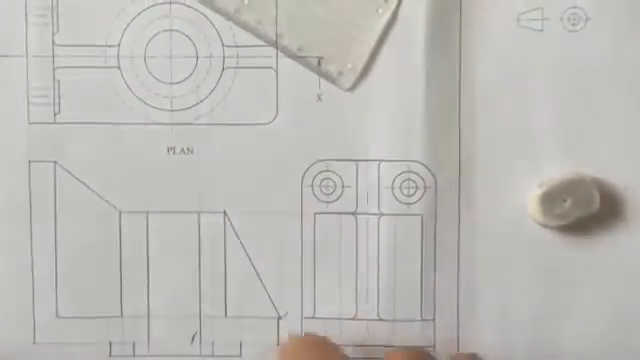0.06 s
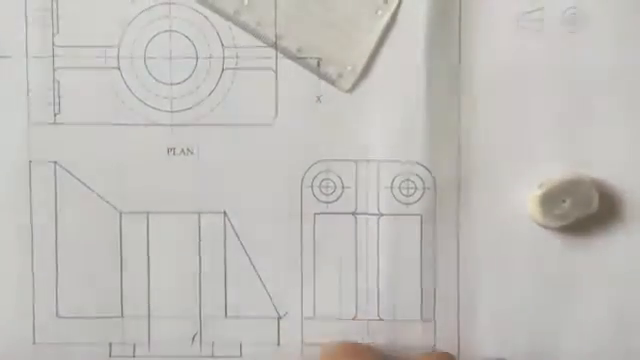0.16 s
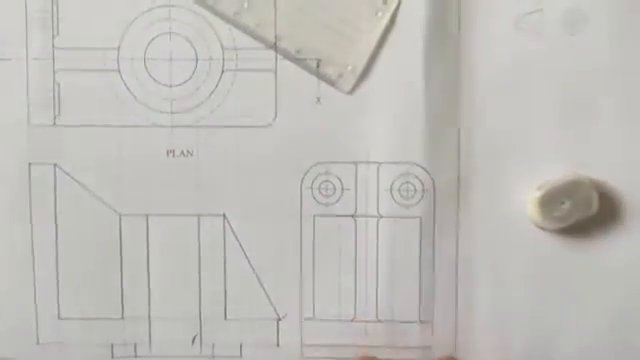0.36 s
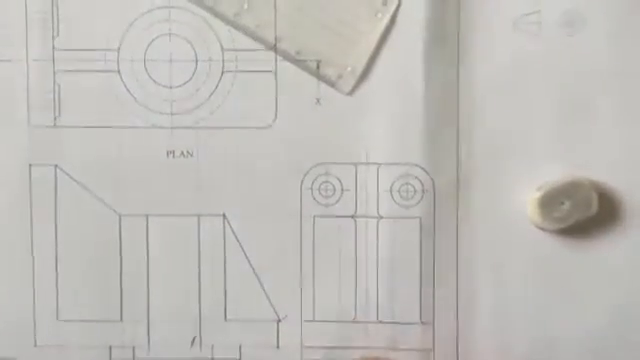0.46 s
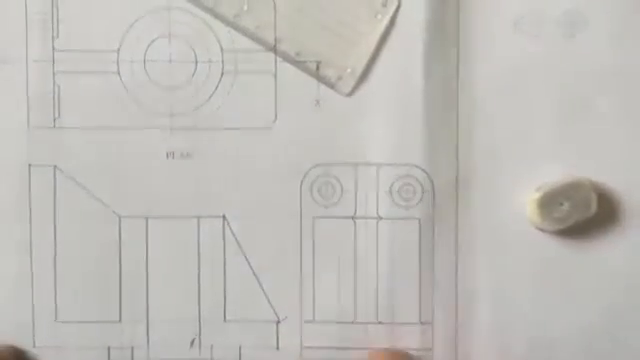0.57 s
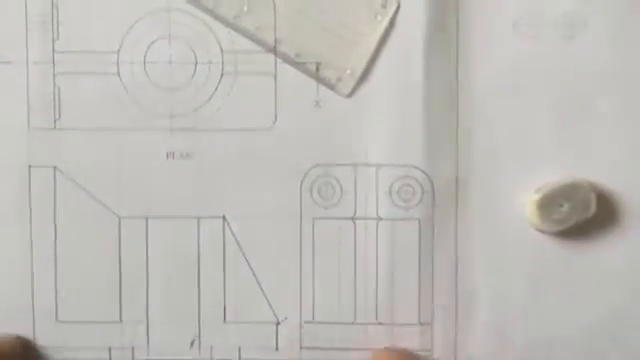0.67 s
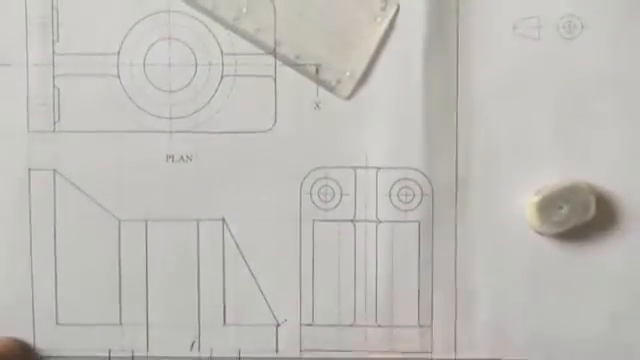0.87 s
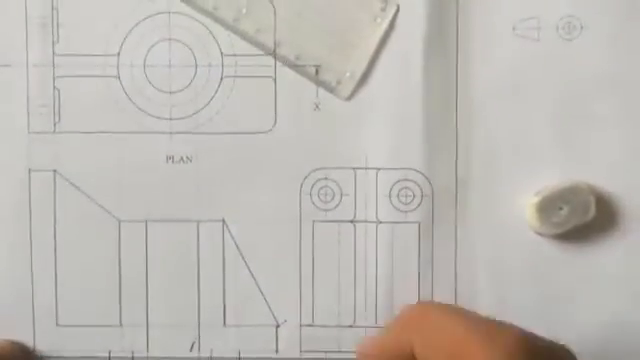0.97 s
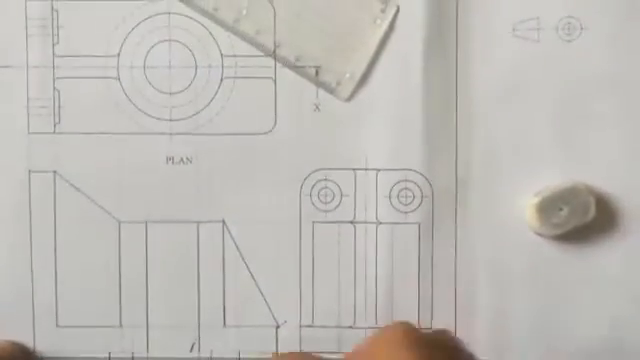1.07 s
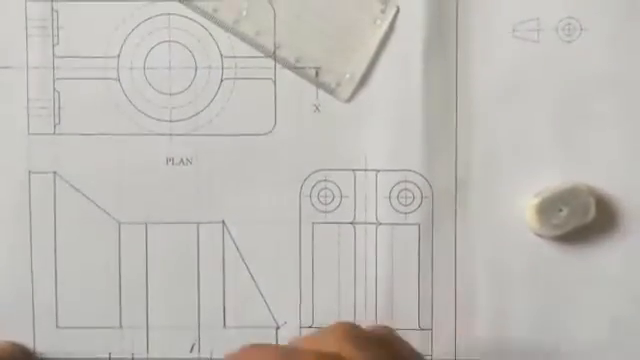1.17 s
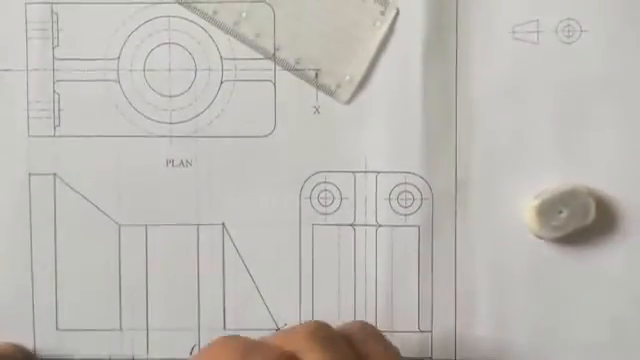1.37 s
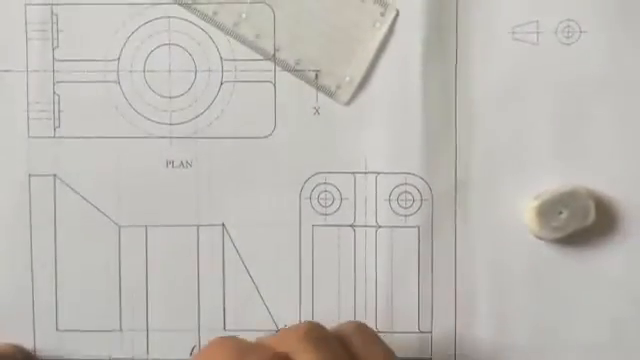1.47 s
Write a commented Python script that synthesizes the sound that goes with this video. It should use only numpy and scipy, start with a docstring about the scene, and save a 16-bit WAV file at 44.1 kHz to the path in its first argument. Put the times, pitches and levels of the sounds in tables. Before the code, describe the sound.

Close up in a small room, a hard plastic ruler is put down and shifted on paper over a desk, giving three uneven groups of clicks and dull knocks with faint scratches, then a softer tap and quiet.

```python
"""Plastic ruler set down on a desk

A plastic ruler is shifted and set down on paper on a desk, close to a camera on the same desk.
Edge taps: brief bank of decaying ruler modes plus a bright noise crack.
Landings: desk-top modes, treble first, bass late. Slides: filtered random grit on the paper.
A small room answers with a diffuse noise tail, over a quiet floor of coloured noise."""
import sys
import numpy as np
from scipy import signal
from scipy.fft import rfft, irfft
from scipy.io import wavfile
from scipy.ndimage import uniform_filter1d

SR = 44100
rng = np.random.default_rng(int(sys.argv[2]) if len(sys.argv) > 2 else 0)


def generate_wav(signal):
    """Clip the signal to [-1, 1] and save it as 16-bit WAV at the path in sys.argv[1]."""
    frames = np.transpose(np.atleast_2d(signal))
    scaled = np.clip(frames, -1, 1) * 32767
    pcm = np.round(scaled).astype(np.int16)
    wavfile.write(sys.argv[1], SR, pcm)


def level_to_linear(level):
    """Convert decibel levels to linear amplitude factors, elementwise."""
    exponent = np.asarray(level, float) / 20
    return 10 ** exponent


N = 66150

# background noise density, relative: hz, level_db_per_hz
FLOOR_SPECTRUM = [(15, -57), (25, 5.5), (242, 4.5), (277, -3), (624, -4), (796, -3), (1040, -4),
                  (2990, -13), (14400, -19), (16000, -32)]
FLOOR_RMS_DB = -62.5

# slides over the paper: start_s, length_s, level_db (rms before the fades), centre_hz
PAPER_SLIDES = [(-.01, 0.035, -56, 2945), (-.01, 0.072, -64, 10060), (0.036, 0.08, -60.5, 3840),
                (0.236, .012, -29, 4700), (0.273, 0.056, -38, 2820), (0.479, .036, -28.5, 3500),
                (0.542, 0.0098, -41, 4300), (.642, 0.034, -32.5, 2060), (0.751, 0.016, -38, 5900),
                (0.779, 0.051, -38, 4200), (1.033, 0.029, -61, 9200), (1.26, 0.05, -69.5, 8090),
                (0.118, 0.037, -62.5, 9400), (0.415, 0.093, -54, 1560), (0.56, 0.071, -51, 1470),
                (0.68, 0.044, -41.5, 3030), (.502, 0.0043, -44, 7900)]
SLIDE_FADE_S = 0.016  # linear rise; time constant of the decay
GRIT_PER_S, GRIT_SPREAD_DB = 9000, 2.5
CATCH_S, CATCH_DB = 0.003, 1.5  # edge catches and slips: time scale, spread of the grit level

# landings on the desk top: start_s, level_db (before DESK_GAIN_DB), ring_centre_hz
DESK_LANDINGS = [(.003, -30, 161), (.057, -24.5, 404), (.059, -27.5, 180), (0.07, -26, 104),
                 (.085, -33.5, 236), (.237, -7.5, 549), (0.2394, -10.5, 170.4), (0.25, -8.5, 377),
                 (0.256, -23, 71), (0.276, -9, 245), (0.287, -11.5, 257), (0.302, -8.5, 442),
                 (0.314, -8, 330), (.323, -10.5, 310), (.320, -12.5, 75), (0.338, -19.5, 118),
                 (0.357, -17, 148.6), (.410, -29.5, 75), (0.454, -35, 65), (0.032, -42, 69.7),
                 (0.124, -41, 70), (.155, -40, 381), (0.197, -39, 137), (.471, -14.5, 480),
                 (.477, -15.5, 346), (0.477, -22, 69.6), (.489, -14.5, 243), (0.514, -13.5, 74),
                 (.545, -19, 73), (.600, -50, 69), (.636, -10, 587), (.654, -11, 511), (.667, -7, 310),
                 (0.683, -13, 255), (0.687, -16, 69.6), (0.691, -21, 304), (.732, -18, 277),
                 (0.733, -21.5, 76), (0.743, -25.5, 194), (.774, -17.5, 214), (.799, -19, 530),
                 (.812, -25.5, 247), (0.917, -41, 71), (.966, -17, 346), (0.973, -17.5, 238),
                 (0.987, -23, 68.8), (0.999, -24, 355), (1.009, -31, 198), (1.099, -54.5, 257),
                 (1.399, -52, 165), (1.471, -48.5, 92)]
# desk-top modes: nominal_hz, relative_level_db, t60_s
DESK_MODES = [(69.2, 4, 0.15), (103.9, 0, 0.089), (157.1, -4, .25), (207.3, -8.5, 0.23), (254.3, 6, 0.05),
              (316, 3.5, 0.072), (357.3, -5.5, 0.18), (429, -3, 0.12), (507, 2.5, 0.071), (573, 5.5, 0.054),
              (714.2, -9.5, .1), (855.3, 6, 0.076), (1093, 0, 0.106), (1260, 8.5, 0.058)]
DESK_GAIN_DB, DESK_REACH_OCT, DESK_LAG_S, DESK_LAG_REF_HZ = -3, 0.99, 0.00084, 166.7

# ruler edge taps, levels before the gains below:
# start_s, ring_level_db, crack_level_db, ring_centre_hz, direct_reach_oct
EDGE_TAPS = [(.058, -28.5, -59, 1080, 0.75), (0.0834, -40, -43.5, 1730, 0.31),
             (0.0951, -32.5, -43.5, 2000, 0.16), (.167, -37.5, -56, 1400, 0.6),
             (0.2048, -35, -47, 2120, 0.25), (0.229, -37.5, -74, 3000, 1), (0.2393, -3, -26, 3400, 0.71),
             (0.245, -20, -35, 3200, 0.65), (0.2508, -17, -35.5, 1200, 0.42), (0.2742, -9, -27, 3300, 0.65),
             (0.2996, -20, -38, 3300, 1), (0.3068, -13.5, -32.5, 3200, 1), (.3255, -23.5, -36, 2940, 1),
             (0.3511, -23, -35.5, 2670, 1), (0.4362, -25, -50.5, 2910, 0.17),
             (.4375, -29.5, -69, 1500, 0.27), (.4602, -46, -37.5, 5620, .2),
             (0.4741, -18.5, -38, 1730, 0.89), (0.4874, -27, -32, 3500, 0.43),
             (0.4977, -16.5, -28.5, 1460, 0.23), (0.5042, -20.5, -27.5, 1480, 0.29),
             (.5105, -20.5, -37, 3000, .6), (.5178, -7, -48, 1394, .3), (.5255, -35, -42, 2970, 0.54),
             (.5470, -22, -33, 2570, 1), (0.6343, -19.5, -20.5, 1190, 0.9), (.641, -10.5, -57, 1100, 0.91),
             (0.65, -13, -31.5, 1260, 1), (0.661, -19, -34, 1300, 0.82), (0.7198, -14.5, -54, 1750, .25),
             (0.725, -21, -66, 1800, 0.39), (.7620, -16.5, -25.5, 2010, 0.7), (0.768, -15.5, -44, 1260, .4),
             (0.7877, -16, -21.5, 3320, 0.34), (0.792, -7, -50, 1150, 1), (0.7975, -45, -49, 1562, 0.97),
             (0.826, -30.5, -31, 1970, 0.43), (0.9636, -14.5, -32.5, 3780, 0.77),
             (0.9676, -29.5, -50, 2500, 1), (0.9962, -26, -42, 3320, 0.58), (1.12, -41.5, -75, 1243, 1),
             (1.1820, -45, -43, 3500, 1), (1.405, -53.5, -70.5, 1202, 0.68)]
# ruler modes: nominal_hz, relative_level_db, direct_t60_s
RULER_MODES = [(1075, 0, .05), (1260, 0, .05), (1480, 0, .035), (1620, 0, .045), (1800, 0, .04),
               (2116, -2, .035), (2450, -3, .03), (2800, -3, .025), (3080, 0, .03), (3300, 1, .03),
               (3550, 0, .028), (3900, -2, .022), (4500, -4, .018), (5500, -6, .015)]
RULER_GAIN_DB, RULER_LAG_S, RULER_LAG_REF_HZ = -4.5, 0.0005, 1400
# crack filter: hz, gain_db
CRACK_SPECTRUM = [(700, -11), (1500, 1), (3000, 1.5), (5000, -0.5), (7000, 0.5), (9000, -5.5), (11000, -11),
                  (13000, -24.5), (15500, -21.5)]
CRACK_GAIN_DB, CRACK_RISE_S = 6.5, 0.0004
CRACK_DECAY_S, CRACK_REF_DB = 0.0029, -26.5  # decay constant of a crack at the reference level
CRACK_SHRINK = 0.38  # dB of length lost per dB below CRACK_REF_DB

# room decay: hz, t60_s
ROOM_DECAY = [(60, .5), (300, 0.6), (1500, 0.47), (5000, 0.58), (12000, 0.65)]
# filter on the sound sent to the room: hz, gain_db
ROOM_SPECTRUM = [(40, -0.5), (300, -4.5), (1500, 3.5), (4000, -2.5), (8000, -4.5), (16000, -13.5)]
ROOM_GAIN_DB, ROOM_RISE_S = -10, 0.006
RING_ROOM_DB, CRACK_ROOM_DB, PAPER_ROOM_DB = 8, 1, 2  # send to the walls, against the desk

CEILING = 0.57  # full scale = 1
BASS_CUT_HZ, TOP_CUT_HZ = 64, 14850


def colour(x, points):
    """Filters by (Hz, dB) points, linear in log frequency."""
    hz, db = np.array(points, float).T
    bin_hz = np.maximum(np.fft.rfftfreq(len(x), 1 / SR), 1)
    gain_db = np.interp(np.log(bin_hz), np.log(hz), db, left=db[0] + 7, right=db[-1] - 6)
    return irfft(rfft(x) * level_to_linear(gain_db), len(x))


def unit(x):
    """Scales to rms 1."""
    return x / np.sqrt(np.mean(x ** 2))


def add(out, start_s, x):
    """Mixes x in at start_s."""
    i = int(start_s * SR)
    out[i:i + len(x)] += x[:len(out) - i]


def floor():
    """Steady background: Gaussian noise shaped by the floor spectrum."""
    return level_to_linear(FLOOR_RMS_DB) * unit(colour(rng.standard_normal(N), FLOOR_SPECTRUM))


def paper():
    """Dense uneven grit under the sliding edge, broad around each slide's centre."""
    out, t = np.zeros(N), np.arange(N) / SR
    hit, size, sign = rng.random((3, N))
    grain_gain = level_to_linear(-GRIT_SPREAD_DB * np.log(size + 1e-9))
    grit = unit((hit < GRIT_PER_S / SR) * grain_gain * np.sign(sign - 0.5))
    catch = unit(uniform_filter1d(rng.standard_normal(N), int(CATCH_S * SR)))
    grit = grit * level_to_linear(CATCH_DB * catch)
    for start_s, length_s, level_db, hz in PAPER_SLIDES:
        rise = np.clip((t - start_s) / SLIDE_FADE_S, 0, 1)
        fall = np.exp(-np.maximum(t - start_s - length_s, 0) / SLIDE_FADE_S)
        spectrum = [(hz / 8, -6), (hz / 3, 3), (hz, 0), (hz * 1.21, -6), (hz * 3, -20)]
        out += level_to_linear(level_db) * unit(colour(grit, spectrum)) * rise * fall
    return out


def ring(starts_s, levels_db, centres_hz, reaches_oct, modes, lag_s, ref_hz, scatter_db, scatter_rad):
    """Each blow rings the modes near its centre; lower modes build up later."""
    out, t = np.zeros(N), np.arange(SR // 4) / SR
    hz, db, t60_s = np.array(modes, float).T[:, :, None]
    rise_s = lag_s * np.sqrt(ref_hz / hz)  # lag_s holds at ref_hz
    envelope = (1 - np.exp(-t / rise_s)) ** 2 * np.exp(-np.log(1000) * t / t60_s)
    mode_phase = -np.pi * np.arange(len(modes))[:, None] / 2
    chance = rng.standard_normal((len(starts_s), 3, len(modes), 1))
    blows = zip(starts_s, levels_db, centres_hz, reaches_oct, chance)
    for start_s, level_db, centre_hz, reach_oct, (gain, detune, phase) in blows:
        distance = np.log2(hz / centre_hz) / reach_oct
        weight = level_to_linear(db + scatter_db * gain) * np.exp(-0.5 * distance ** 2)
        wave = np.sin(2 * np.pi * hz * (1 + 0.042 * detune) * t + mode_phase + scatter_rad * phase)
        blow = (weight * envelope * wave).sum(0) / np.sqrt((weight ** 2).sum())
        add(out, start_s, level_to_linear(level_db) * blow)
    return out


def desk():
    """Landings send bending waves through the desk top: modes rise treble first, bass late."""
    start_s, level_db, hz = np.array(DESK_LANDINGS, float).T
    reach_oct = np.full(len(start_s), DESK_REACH_OCT)
    return ring(start_s, level_db + DESK_GAIN_DB, hz, reach_oct, DESK_MODES,
                DESK_LAG_S, DESK_LAG_REF_HZ, scatter_db=3.0, scatter_rad=1.0)


def ruler_cracks():
    """Contact of each edge tap: a bright noise burst, shorter when softer."""
    start_s, _, crack_db, _, _ = np.array(EDGE_TAPS, float).T
    t, out = np.arange(SR // 40) / SR, np.zeros(N)
    noises = rng.standard_normal((len(start_s), len(t)))
    for start, level_db, noise in zip(start_s, crack_db, noises):
        decay_s = CRACK_DECAY_S * level_to_linear(CRACK_SHRINK * (level_db - CRACK_REF_DB))
        envelope = (1 - np.exp(-t / CRACK_RISE_S)) * np.exp(-t / decay_s)
        add(out, start, level_to_linear(level_db + CRACK_GAIN_DB) * noise * envelope)
    return colour(out, CRACK_SPECTRUM)


def ruler_rings(reach_scale, t60_scale):
    """Edge taps excite the ruler's modes, which die within tens of milliseconds."""
    start_s, ring_db, _, hz, reach_oct = np.array(EDGE_TAPS, float).T
    modes = np.array(RULER_MODES) * [1, 1, t60_scale]
    return ring(start_s, ring_db + RULER_GAIN_DB, hz, reach_oct * reach_scale, modes,
                RULER_LAG_S, RULER_LAG_REF_HZ, scatter_db=2, scatter_rad=2.4)


def room(x):
    """Diffuse tail: octave bands of noise, each decaying at its own t60."""
    t, tail = np.arange(SR // 2) / SR, 0
    decay_hz, decay_t60_s = np.array(ROOM_DECAY, float).T
    for hz, noise in zip(45 * 2.0 ** np.arange(9), rng.standard_normal((9, len(t)))):
        edges_hz = [hz / np.sqrt(2), hz * np.sqrt(2)]
        band = signal.sosfilt(signal.butter(2, edges_hz, "band", fs=SR, output="sos"), noise)
        t60_s = np.interp(np.log(hz), np.log(decay_hz), decay_t60_s)
        tail = tail + band * np.exp(-np.log(1000) * t / t60_s)
    tail = tail * np.clip(t / ROOM_RISE_S, 0, 1)
    tail = tail / np.sqrt((tail ** 2).sum())
    return level_to_linear(ROOM_GAIN_DB) * signal.fftconvolve(colour(x, ROOM_SPECTRUM), tail)[:N]


def scene():
    """Ruler, desk and paper in the room, over its floor."""
    cracks = ruler_cracks()
    rings = ruler_rings(reach_scale=1, t60_scale=1)
    rings_far = ruler_rings(reach_scale=2.2, t60_scale=0.18)  # the walls get a broader, shorter ring
    thuds, grit = desk(), paper()
    far = level_to_linear(RING_ROOM_DB) * rings_far + level_to_linear(CRACK_ROOM_DB) * cracks
    far = far + level_to_linear(PAPER_ROOM_DB) * grit + thuds
    mix = rings + cracks + thuds + grit + room(far) + floor()
    return mix[None]


def roll_off(x):
    """The treble ends steeply here."""
    return signal.sosfilt(signal.butter(12, 16320, fs=SR, output="sos"), x)


def record(dry):
    """The camera rounds peaks towards the ceiling, then cuts the deep bass and the top."""
    rounded = CEILING * np.tanh(dry / CEILING)
    bass_cut = signal.butter(2, BASS_CUT_HZ, "high", fs=SR, output="sos")
    top_cut = signal.ellip(6, 0.3, 35, TOP_CUT_HZ, fs=SR, output="sos")  # ripple_db, stop_db
    mix = signal.sosfilt(np.vstack([bass_cut, top_cut]), rounded)
    return roll_off(mix)


dry = scene()
out = record(dry)
generate_wav(out)
```